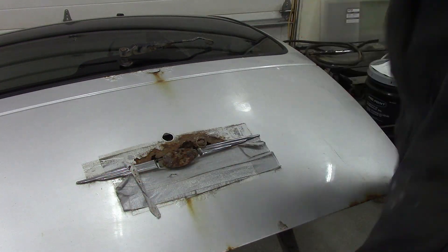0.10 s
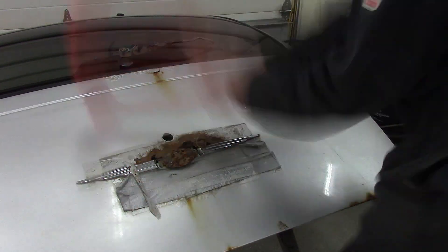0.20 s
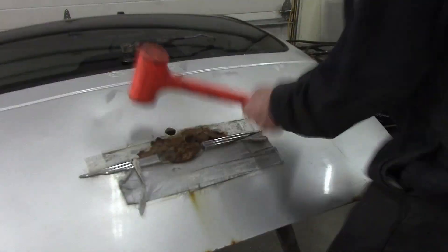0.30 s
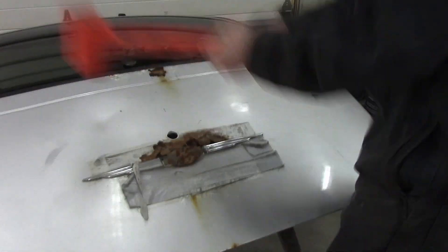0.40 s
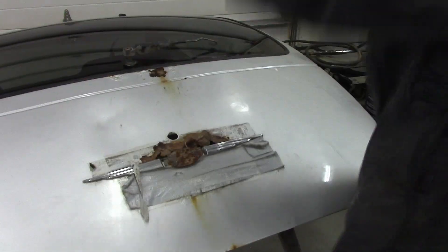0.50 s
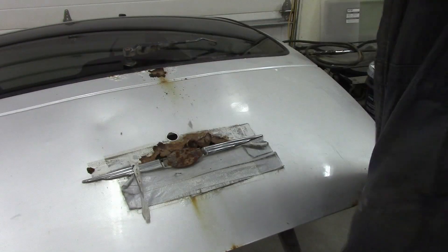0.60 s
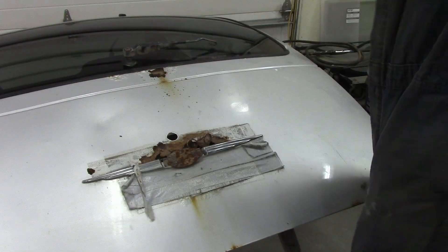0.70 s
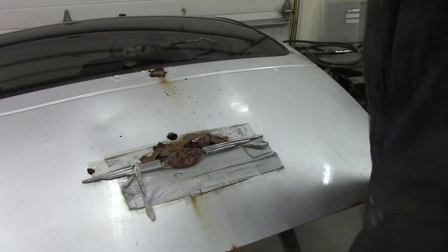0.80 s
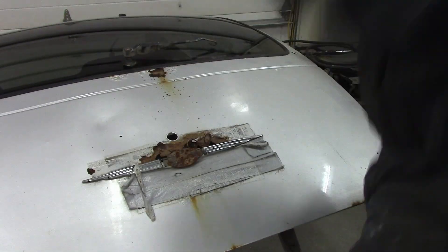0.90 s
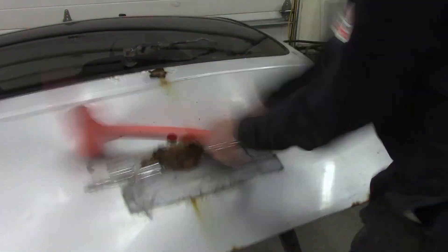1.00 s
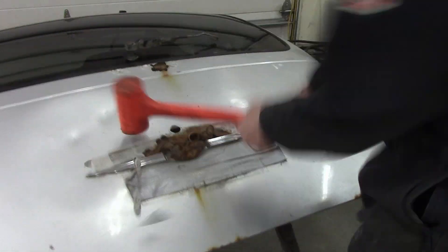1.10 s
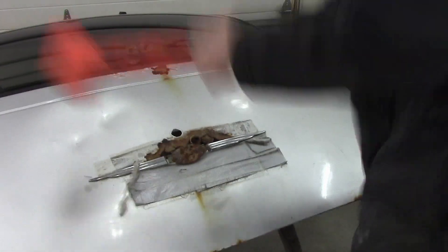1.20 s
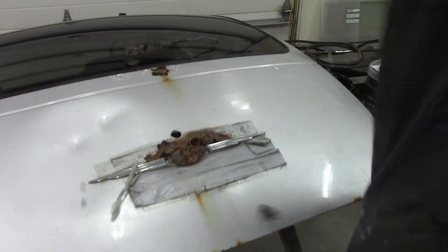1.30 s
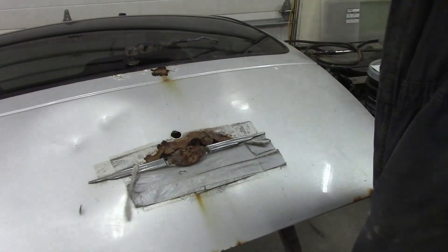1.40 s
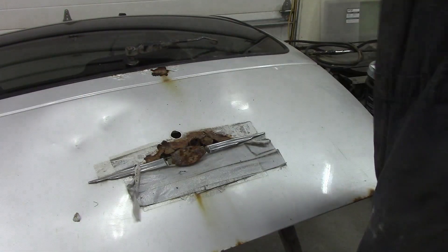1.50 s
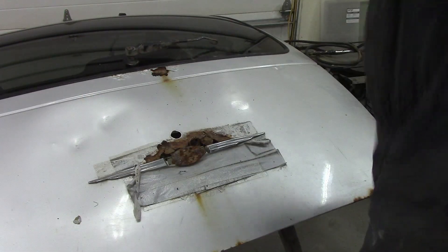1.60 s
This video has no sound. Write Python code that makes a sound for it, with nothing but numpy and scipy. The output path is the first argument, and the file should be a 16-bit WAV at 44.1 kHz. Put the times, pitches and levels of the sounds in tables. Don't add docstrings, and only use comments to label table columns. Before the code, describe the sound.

A mallet strikes a sheet-metal car hood twice in an echoing workshop, first blow ringing longer

```python
import sys
import numpy as np
from scipy import signal
from scipy.fft import rfft, irfft
from scipy.io import wavfile
from scipy.ndimage import uniform_filter1d

SR = 44100
rng = np.random.default_rng(int(sys.argv[2]) if len(sys.argv) > 2 else 0)


def generate_wav(sig):
    pcm = np.round(np.clip(np.atleast_2d(sig).T, -1, 1) * 32767).astype(np.int16)
    wavfile.write(sys.argv[1], SR, pcm)


def elevation(decibels):
    levels = np.asarray(decibels, float)
    return 10 ** (levels / 20)


N = 70560
HOT_DB = 28.5


def evened(x):
    return x / np.sqrt(np.mean(x ** 2) + 1e-20)


def read(points, hz):
    f, value = np.transpose(points)
    return np.interp(np.log(hz + 1), np.log(f + 1), value)


def add(mix, s, sound):
    part = mix[..., round(s * SR):][..., :sound.shape[-1]]
    part += sound[..., :part.shape[-1]]


def coloured(x, points):
    size = x.shape[-1]
    return irfft(rfft(x) * elevation(read(points, np.fft.rfftfreq(size, 1 / SR))), size)


def decaying(colour, t60, size, count=256):
    noise = evened(coloured(rng.standard_normal((2, size)), colour))
    hz, t, z = signal.stft(noise, SR, nperseg=count)
    fade = elevation(-60 * t / read(t60, hz)[:, None])
    return signal.istft(z * fade, SR, nperseg=count)[1][:, :size]


# (frequency [Hz], side over middle [dB])
WIDTH = [(2200, -45.5), (3000, -20.5), (5000, -15), (8000, -11.5), (12000, -11), (15000, -31.5)]


def spread(mid, side, lean_db):
    side = coloured(side, WIDTH)
    return np.array([mid + side, mid - side]) * elevation([[-lean_db / 2], [lean_db / 2]])


# (frequency [Hz], level [dB per Hz])
AIR = [(18, -67.5), (30, -39.5), (210, -1.5), (801, -1.5), (1500, -4), (1630, -7.5), (2350, -4),
       (7870, -17), (16000, -35.5)]


def air():
    noise = evened(coloured(rng.standard_normal((2, N)), AIR))
    return elevation(-36.5 - HOT_DB) * spread(*noise, 0.5 * LEAN_DB[0])


def ping(hz, db, t60, share):
    t = np.arange(1500) / SR
    wobble = 1 - share + share * rng.standard_normal(len(t))
    return elevation(db - 60 * t / t60) * wobble * np.sin(2 * np.pi * hz * t)


# (time [s], level [dB], frequency [Hz])
KNOCKS = [
    (.0128, -13, 620),
    (.0213, -11.5, 714),
    (0.032, -27, 620),
    (.055, -14.5, 700),
]
# (frequency [Hz], level [dB], time to fall 60 dB [s], never more than 0.6 s)
KNOCK_RING = [
    (383, -9, 0.17),
    (447, -6, 0.63),
    (567, -5.5, .7),
    (656, -3.5, 0.2),
    (760, -7.5, 1),
    (915, -7.5, .5),
]


def knocks():
    out = np.zeros(N)
    for s, db, hz in KNOCKS:
        add(out, s, ping(hz, db - HOT_DB, t60=0.0027, share=0.068))
    tail_colour = [(200, -43), (600, -1), (1500, -6), (4000, -22), (12000, -23.5)]  # (Hz, dB)
    tail = decaying(tail_colour, [(100, 0.1)], SR // 2)
    t = np.arange(SR // 2) / SR
    for hz, db, t60 in KNOCK_RING:
        level = elevation(-33.5 - HOT_DB + db - 60 * t / min(t60, 0.6))
        add(out, KNOCKS[1][0], level * np.sin(2 * np.pi * hz * t))
    add(out, KNOCKS[0][0], elevation(-30 - HOT_DB) * tail[0])
    return out


# (time [s], length [s], level [dB], frequency [Hz], time a grain rings [cycles])
SHOT = [
    (0.019, 0.15, -43.5, 7000, 1.2),
    (0.08, 0.075, -40, 11200, 5.0),
    (0.082, 0.062, -39.5, 7500, 1.1),
    (.084, .065, -50, 14500, 2.5),
    (.208, .009, -35, 3800, 5.0),
    (0.207, 0.033, -46, 8500, 1.3),
    (0.988, 0.014, -58, 7200, 3.0),
    (0.978, 0.013, -76, 11400, 1.5),
]


def shot():
    out = np.zeros(N)
    t = np.arange(4000) / SR
    for s, length, db, hz, cycles in SHOT:
        hits = rng.standard_normal(len(t)) * (rng.random(len(t)) < 10000 / SR)
        grain = np.exp(-t[:200] * hz / cycles) * np.sin(2 * np.pi * hz * t[:200])
        slide = evened(np.convolve(hits, grain)[:len(t)])
        fade_in = np.clip(t / 0.00097, 0, 1)
        fade_out = np.clip((length - t) / (0.43 * length), 0, 1) ** 0.5
        level = elevation(db - HOT_DB * (s < BLOWS[0][0]))
        add(out, s, level * fade_in * fade_out * slide)
    return out


# (time [s], level [dB], frequency [Hz])
GRIT = [(.451, -34, 12300), (.5, -45, 10500), (.545, -54, 11100), (0.594, -43, 11240), (.692, -68, 11170),
        (.74, -67, 13630), (0.7762, -35.5, 3610), (0.779, -58, 9700), (.803, -62, 11000), (.827, -62, 9500),
        (.9, -57, 9600), (.9675, -68, 11400), (1.286, -53, 11050), (1.36, -62, 10500), (1.395, -63, 11050),
        (1.469, -61, 9980), (1.5275, -66.5, 9430)]


def grit():
    out, t = np.zeros(N), np.arange(1000) / SR
    for s, db, hz in GRIT:
        broad = [(hz * 0.3, -30), (hz * 0.75, -5), (hz, 0), (hz * 1.4, -6), (hz * 3, -25)]
        click = evened(coloured(rng.standard_normal(len(t)), broad))
        add(out, s, elevation(db - 60 * t / 0.0032) * click)
    return out


def dust():
    strength = elevation(3.5 * np.minimum(rng.exponential(1, N), 4))
    specks = strength * (rng.random(N) < 900 / SR)
    t, clock = np.arange(1000) / SR, np.arange(N) / SR
    colour = [(4000, -19), (9000, -8), (11500, 4.5), (13000, -8.5), (16000, -21)]  # (Hz, dB)
    puff = np.exp(-t / 0.00078) * coloured(rng.standard_normal(len(t)), colour)
    first, second = BLOWS[0][0], BLOWS[1][0]
    since = np.where(clock < second, clock - first, clock - second)
    level = elevation(-62.5 - 60 * since / 3) * (since > 0)
    return level * evened(signal.oaconvolve(specks, puff)[:N])


# (frequency [Hz], level [dB per Hz])
ECHO = [
    [(76, -52), (130, -12.5), (315, 0.5), (846, -5), (1080, -11), (2010, -13.5), (9480, -33.5),
     (11400, -34), (16000, -55.5)],
    [(76, -56), (130, -12), (243, -4), (303, 0.5), (3130, -7.5), (6870, -20.5), (13300, -31), (15100, -47),
     (16000, -69)],
]
# (frequency [Hz], time to fall 60 dB [s])
SHOP = [(100, .5), (170, 0.54), (280, 0.75), (700, 0.83), (1500, 1.03), (2800, 1.132), (5500, 1.03),
        (12800, 0.32)]


def echo(k, delay, build):
    t = np.arange(SR) / SR
    return decaying(ECHO[k], SHOP, SR, count=1024) * (1 - np.exp(-np.maximum(t - delay, 0) / build))


# (frequency [Hz], level [dB])
FAVOURED = [
    [(136, -32), (163, -31.5), (219, -34.5), (253, -34), (280, -21), (362, -37.5), (441, -23), (500, -27),
     (555, -25), (630, -34.5), (905, -31.5), (1066, -34.5), (1260, -36.5), (1552, -34)],
    [(843, -40), (1050, -20), (1168, -57), (1263, -33), (1486, -26), (1780, -29), (1954, -33), (2033, -39),
     (2249, -29.5), (2372, -28), (2767, -38.5), (3101, -27), (3348, -41)],
]
# (frequency [Hz], level [dB per Hz])
BODY = [
    [(35, -53.5), (60, -32), (202, -5.5), (566, -6.5), (1140, -12), (4030, -22), (10000, -62), (14600, -57),
     (16000, -91)],
    [(76, -60), (130, -17.5), (402, -0.5), (577, -11), (720, -0.5), (1550, -2.5), (1970, 1.5), (6870, -16),
     (16000, -52)],
]
BODY_DB = [
    0.5,
    7.5,
]


def ring(k, hold, t60, swell_db):
    t = np.arange(SR) / SR
    hz, db = np.transpose(FAVOURED[k])[:, :, None]
    turn = 2 * np.pi * rng.random((3, len(hz), 1))
    beat_hz = 9.13 * rng.uniform(0.65, 1.5, (len(hz), 1))
    glide, glide_s = 0.011, 0.029
    bent = t + glide * glide_s * (1 - np.exp(-t / glide_s))

    def pairs(a, b):
        lower = np.sin(2 * np.pi * (hz - beat_hz / 2) * bent + a)
        upper = np.sin(2 * np.pi * (hz + beat_hz / 2) * bent + b)
        return evened((elevation(db) * (lower + 0.6 * upper)).sum(axis=0))

    tones = np.array([pairs(turn[0], turn[1]), pairs(turn[2], turn[0])])
    body = elevation(BODY_DB[k]) * evened(coloured(rng.standard_normal((2, SR)), BODY[k]))
    bloom_db = -swell_db * np.maximum(1 - t / hold, 0) - 60 * np.maximum(t - hold, 0) / t60
    return (tones + body) * np.minimum(t / 0.0098, 1) * elevation(bloom_db)


# (frequency [Hz], level [dB per Hz])
CRACK = [
    [(24, -28.5), (40, 7), (630, 0.5), (1760, -9.5), (2260, -5.5), (3560, -15), (4340, -21.5),
     (5720, -19.5), (16000, -47)],
    [(24, -51), (40, -70), (237, -15), (503, -11.5), (1410, -2.5), (2770, -6.5), (9220, -25), (10700, -24),
     (16000, -43.5)],
]


def crack(k, t60):
    t = np.arange(SR) / SR
    quick = [(100, t60 * 2.2), (2000, t60), (10000, t60 * 1.6)]
    return decaying(CRACK[k], quick, SR) * np.minimum(t / 0.0003, 1)


TICK_DB = [
    -46,
    -2.5,
]


def tick(k):
    t = np.arange(SR) / SR
    burst = elevation(TICK_DB[k]) * np.exp(-t / 0.0005) * rng.standard_normal((2, SR))
    return uniform_filter1d(burst, size=3, axis=1) - uniform_filter1d(burst, size=40, axis=1, origin=19)


# (time [s], crack level [dB], crack time to fall 60 dB [s], ring level [dB], echo level [dB])
BLOWS = [
    (.2322, -6.5, 0.18, -14.5, -10),
    (1.0119, -7.5, 0.14, -27, -16.5),
]
# (ring hold [s], ring time to fall 60 dB [s], ring swell [dB],
# echo delay [s], echo build-up [s])
SUSTAIN = [
    (.095, 0.53, 9, 0.0067, 0.02),
    (0.081, 0.14, -1, 0.064, 0.025),
]
LEAN_DB = [
    2.6,
    0,
]


def blow(k):
    s, crack_db, crack_t60, ring_db, echo_db = BLOWS[k]
    hold, ring_t60, swell_db, delay, build = SUSTAIN[k]
    near = elevation(crack_db) * crack(k, crack_t60) + elevation(ring_db) * ring(k, hold, ring_t60, swell_db)
    near = near + tick(k)
    far = elevation(echo_db) * echo(k, delay, build)
    return s, spread(*near, LEAN_DB[k]) + spread(*far, 0.12 * LEAN_DB[k])


def scene():
    mix = air()
    mix = mix + (shot() + knocks()) * elevation([[-0.7], [0.7]])
    mix = mix + (grit() + dust()) * elevation([[1.5], [-1.5]])
    for k in range(len(BLOWS)):
        add(mix, *blow(k))
    return mix


def low_pass(x):
    return signal.sosfilt(signal.butter(12, 16340, fs=SR, output="sos"), x)


def record(dry):
    since = np.maximum(np.arange(N) / SR - BLOWS[0][0] - 0.002, 0)
    cut = signal.sosfilt(signal.butter(3, 121.4, "high", fs=SR, output="sos"), dry)
    gain = elevation(HOT_DB * np.exp(-since / 0.0023))
    hot = np.clip(cut * gain, -1, 1)
    edge = signal.firwin(255, 16300, window=("kaiser", 7), fs=SR)
    mix = signal.oaconvolve(hot, edge[None], "same")
    return low_pass(mix)


dry = scene()
out = record(dry)
generate_wav(out)
```